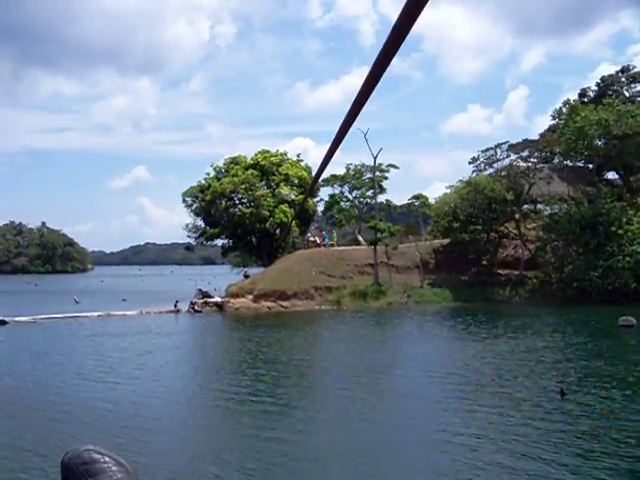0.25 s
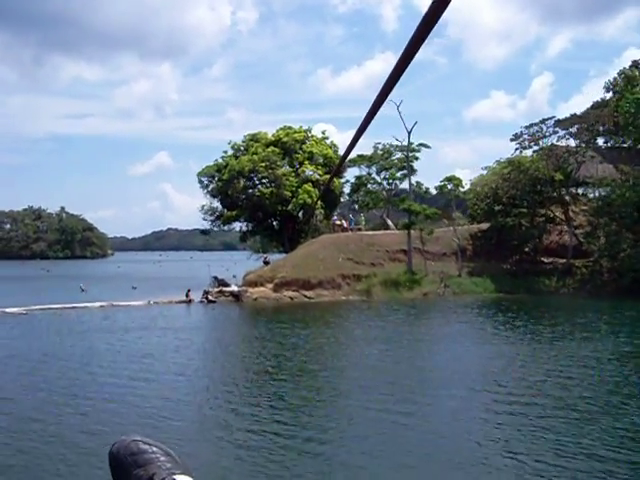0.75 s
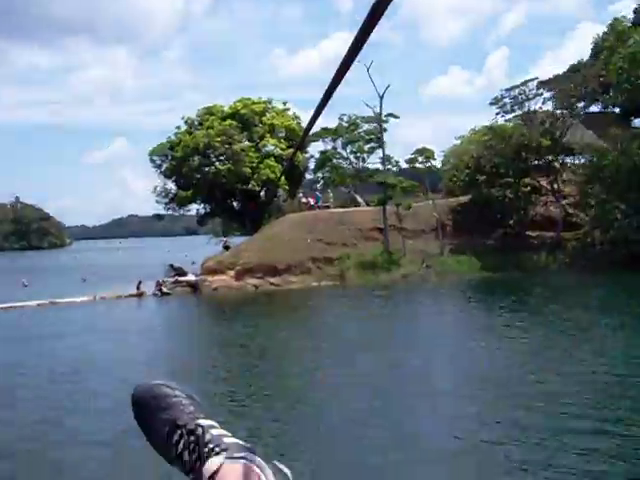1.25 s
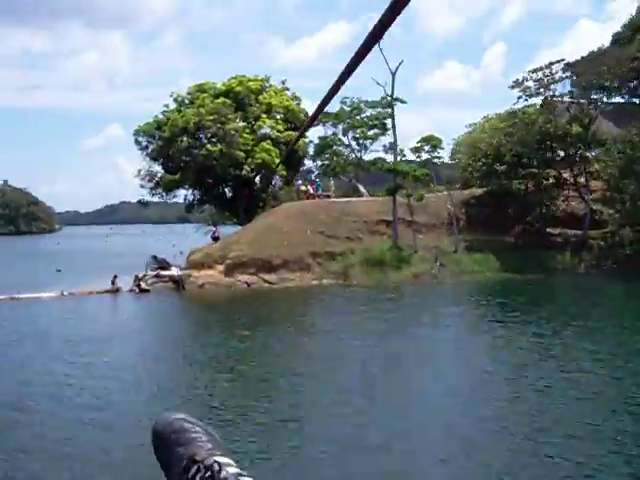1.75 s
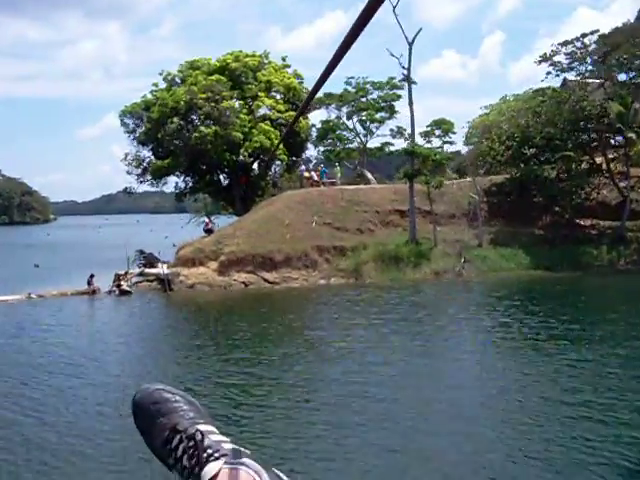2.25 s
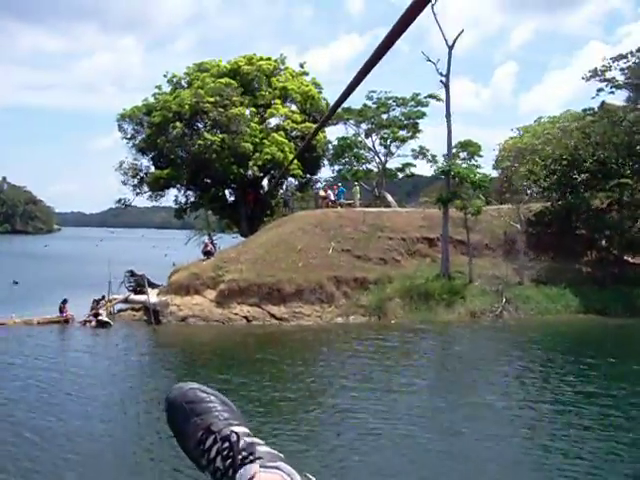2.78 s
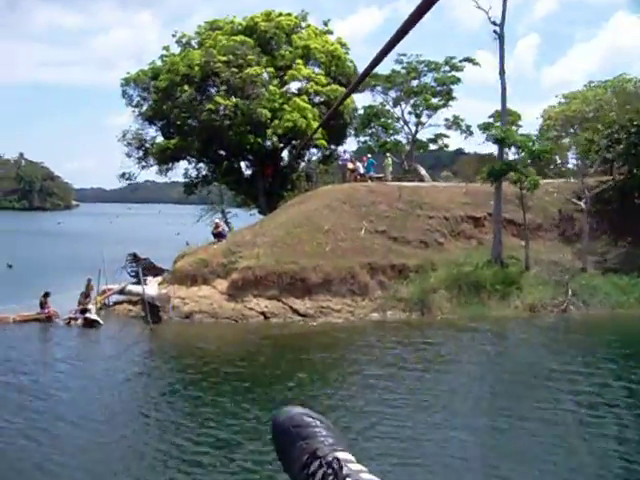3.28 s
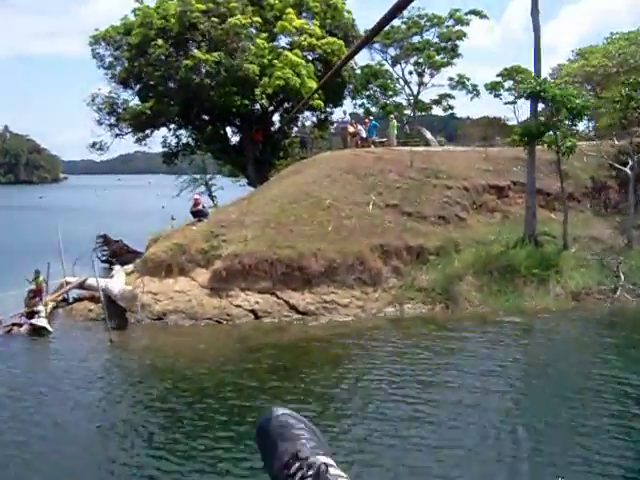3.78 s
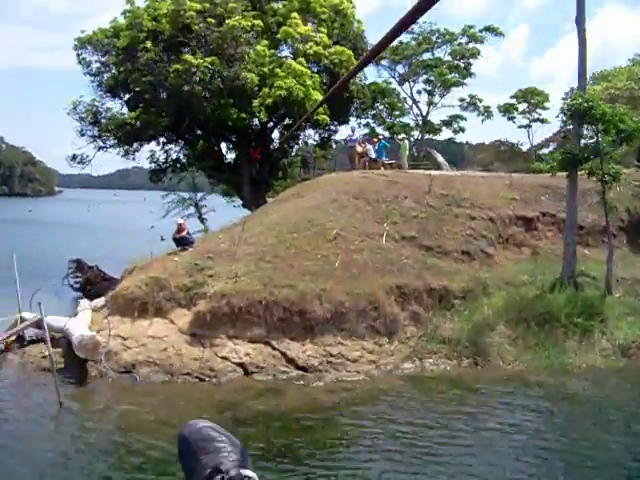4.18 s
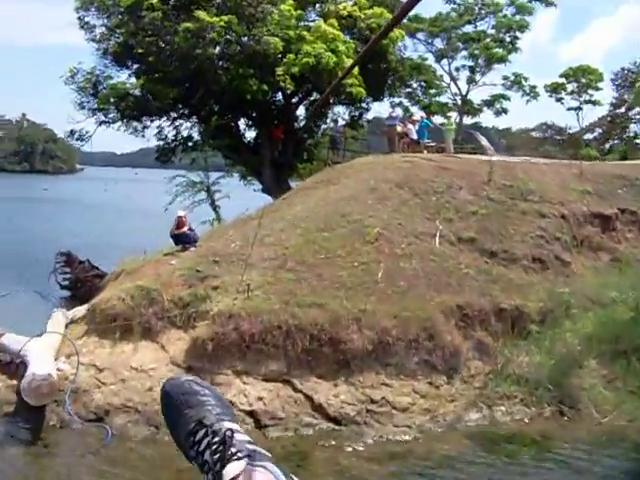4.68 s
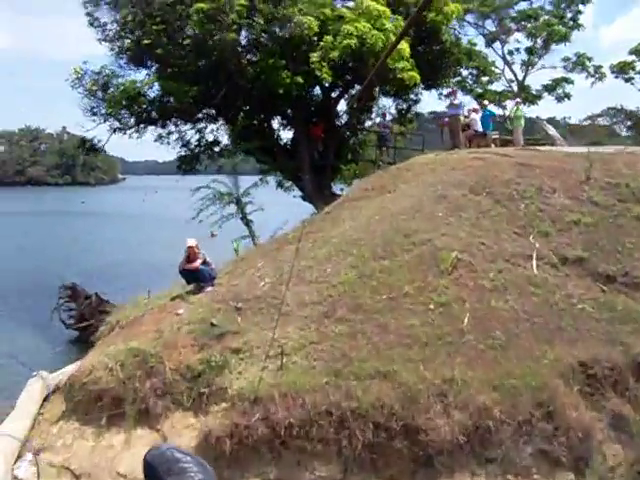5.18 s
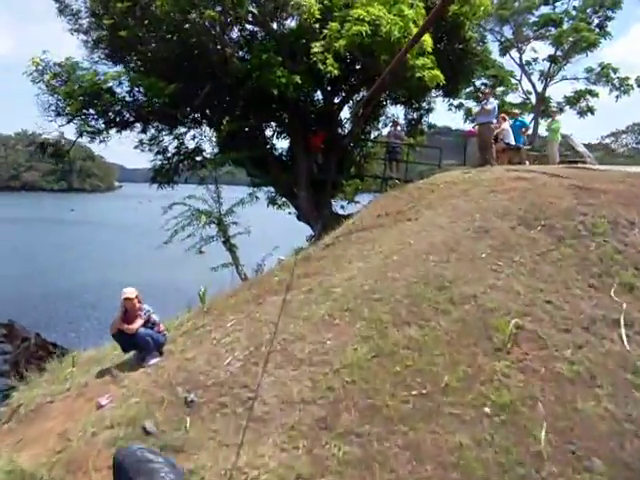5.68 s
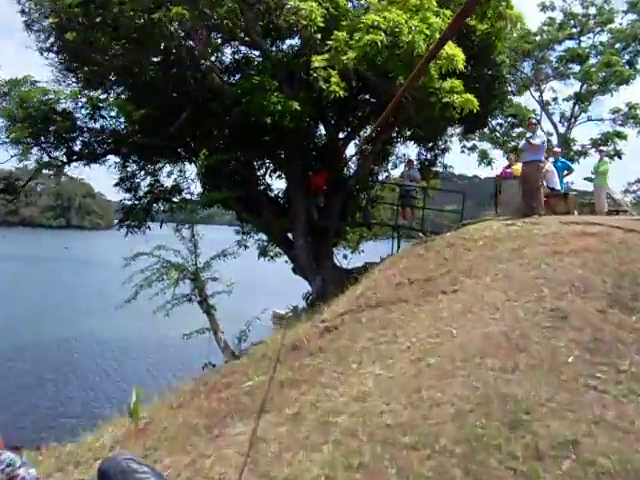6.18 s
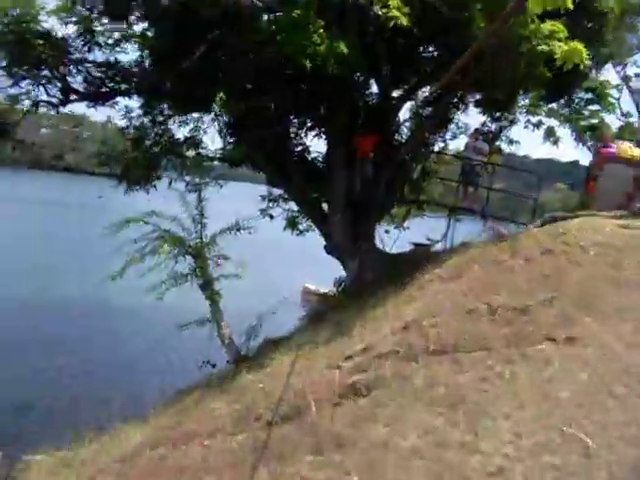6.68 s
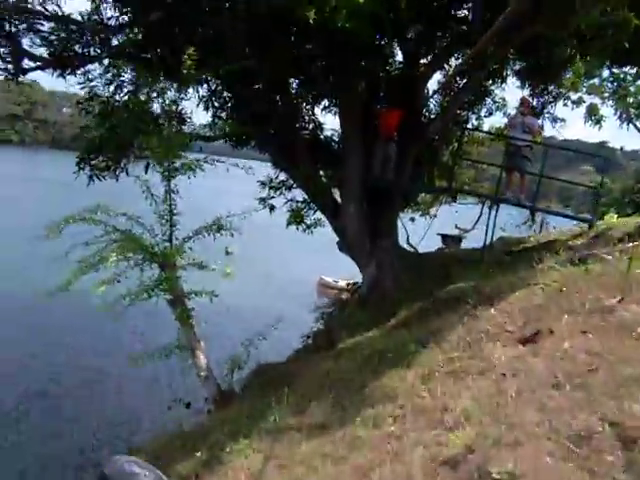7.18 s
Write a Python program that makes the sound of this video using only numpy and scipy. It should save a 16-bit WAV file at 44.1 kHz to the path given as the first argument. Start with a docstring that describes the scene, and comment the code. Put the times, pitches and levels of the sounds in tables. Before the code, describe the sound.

Gusty wind hits the microphone on a zip-line ride across open water, with low, distorted thumps through the first half. Close overhead, the pulley wheels keep up a shrill, fluttering steel whine and hiss, with a faint sinking note behind. As the trolley loses speed the wind dies down, and shortly before the landing the wheels bite into the cable with a rougher, louder buzz.

```python
"""A zip-line trolley runs down a steel cable over a lake, slowly losing speed; the microphone rides just
under it. The sheaves grind over the twisted strands and ring the trolley's steel, throbbing once a turn,
and bite hard near the landing. Behind the whine the strands hum a faint falling note.
Wind buffets the microphone, and whine and wind together overload its input."""
import sys
import numpy as np
from scipy.fft import rfft, irfft
from scipy.io import wavfile

SR = 44100
rng = np.random.default_rng(int(sys.argv[2]) if len(sys.argv) > 2 else 0)


def inscribe(sig):
    """Save sig as 16-bit PCM at rate SR to the path in sys.argv[1].

    A 1-D sig is mono; a 2-D sig holds one channel per row.
    Samples are clipped to [-1, 1] before scaling.
    """
    pcm = np.round(np.clip(np.atleast_2d(sig).T, -1, 1) * 32767)
    wavfile.write(sys.argv[1], SR, pcm.astype(np.int16))


N = 328545
TIME = np.arange(N) / SR
FREQS = np.fft.rfftfreq(N, 1 / SR)
CRUISE_HZ = 60  # sheave turns per second
BITE_S, BITE_ATTACK_S = 6.62, 0.045  # the hard bite near the landing


# speed of the ride over the lake: (time [s], sheave turn rate [Hz])
TURN_RATE = [(0, 71.7), (4.4, 51.9), (6.55, 40.3), (7, 36), (7.45, 32.3)]
# rolling contact, close overhead: (time [s], relative level [dB], high ring [dB], low ring [dB])
CONTACT = [(0, -19.5, 1, -5), (.5, -20.5, 3, -1.5), (1.2, -20.5, 0, -.5), (2.1, -19, -2.5, -2),
           (2.6, -20, -1, -2), (3.25, -23, -4, 1), (4.2, -23, -2, 1.5), (4.85, -23, -3.5, -0.5),
           (5.2, -20.5, -3, -2), (6.35, -20, -1.5, -3.5), (6.75, -19.5, -2.5, -2.5),
           (7.45, -19.5, -6, -3.5)]
# the sheave rides light for an instant: (time [s], length [s], dip [dB])
CONTACT_DIPS = [(3.72, 0.013, -12), (4.519, 0.01, -12), (6.578, .008, -2), (6.6, 0.15, -3.5),
                (6.833, 0.008, -7), (6.868, 0.011, -10)]

def trolley():
    """Just above the microphone, rough rolling contact sets steel and cable sounding."""
    turn_hz, = curves(TURN_RATE)
    contact_db, high_db, low_db = curves(CONTACT)
    hard_bite = np.clip((TIME - BITE_S) / BITE_ATTACK_S, 0, 1)
    bite = hard_bite + (1 - hard_bite) * (0.22 + 0.041 * TIME)  # creeps up, then jumps to 1
    roll_db = contact_db + 3 * hard_bite + 0.5 * waver(6.3) + swells(CONTACT_DIPS)
    turn_phase = 2 * np.pi * np.cumsum(turn_hz) / SR
    strand_phase = 8.04 * turn_phase  # strands passed per turn
    # the load on the contact wavers, and rises a little once a turn
    load_db = 1.2 * np.cos(turn_phase) + 0.69 * waver(42) + 2.2 * waver(260)
    load = unit(undb(load_db) * rng.choice([-1, 1], N))
    # where the cable sits in the groove shifts the weight between low and high modes
    low = undb(low_db + 2 * hard_bite + 0.53 * waver(9))
    high = undb(high_db + 0.24 * waver(7.9))
    whine = (1 - 0.34 * bite) * steel_whine(load, turn_phase, hard_bite, low, high, high_db)
    buzz = undb(-5.5) * bite * strand_buzz(load, strand_phase)
    hiss = undb(-1) * (1 - 0.5 * bite) * np.sqrt(low * high) * grind(load)
    rolling = undb(roll_db) * (undb(23.5) * (whine + buzz) + hiss)
    return rolling + cable_hum(strand_phase, turn_hz, hard_bite)


# sheaves and side plates: (frequency [Hz], width [Hz], relative level [dB], throb per turn [0-1])
STEEL_MODES = [(1662, 13, -17.5, 0.4), (2176, 46.4, -9, .15), (3410, 92, -6.5, 0.34),
               (4257.5, 83.4, 0, 0.55), (4627, 52, -14.5, 0.6), (5385, 133, -7.5, 0.17),
               (5704, 160, -15, 0), (6058, 77, -4, 0.53), (6690, 9.8, -17.5, 0), (6770, 45, -14.5, 0.2),
               (7490, 150, -21, 0.4), (8730, 520, -23, 0)]

def steel_whine(load, turn_phase, hard_bite, low, high, high_db):
    """The contact rings the steel; the ringing sheave turns, so its whine throbs at the microphone."""
    whine = 0
    for hz, width_hz, db, throb in STEEL_MODES:
        weight = low if hz < 3800 else high if hz > 5000 else 1
        depth = throb * (1 - 0.4 * hard_bite)  # the hard bite steadies the throb
        facing = (1 + depth * np.cos(turn_phase)) / np.sqrt(1 + depth ** 2 / 2)
        flare_db = 0.86 * high_db * np.exp(-((hz - 6100) / 220) ** 2)  # near 6100 Hz it flares most
        gain = undb(db + flare_db + 0.78 * waver(17)) * weight * facing
        whine += gain * ring(load * noise(), hz, width_hz)
    return whine


# modes that the bite wakes: (frequency [Hz], width [Hz], relative level [dB])
BUZZ_MODES = [(1660, 25, -14), (2180, 42, -3), (2480, 120, -21), (3370, 170, -11), (4185, 80, 2.5),
              (4440, 120, -10), (5230, 180, -17), (5745, 80, -13), (6035, 60, -10)]

def strand_buzz(load, strand_phase):
    """As the sheave bites, every strand strikes it: a buzz."""
    strikes = unit(undb(11 * np.cos(strand_phase)) * load * noise())
    return sum(undb(db) * ring(strikes, hz, width_hz) for hz, width_hz, db in BUZZ_MODES)


# hiss at the groove, heard close: (frequency [Hz], relative level [dB])
GRIND_SPECTRUM = [(200, -16), (600, -6), (1200, -4), (1950, -3.5), (2400, 0.5), (3000, -1), (4900, -5.5),
                  (6300, -1), (7400, -4.5), (7900, -8.5), (9000, -24.5)]

def grind(load):
    """Steel on steel gives a broad hiss that follows the load."""
    return unit(shape(load * noise(), colour(GRIND_SPECTRUM)))


# the cable overhead under the hard bite: (multiple of the strand rate [-], relative level [dB])
HUM_PARTIALS = [(2, -44), (4, -54)]

def cable_hum(strand_phase, turn_hz, hard_bite):
    """Passing strands give a faint note that sinks with the speed; the hard bite wakes its overtones."""
    fundamental_db = -50.5 + 0.4 * (CRUISE_HZ - turn_hz) - 11.5 * hard_bite
    phase = strand_phase + 0.2 * waver(12)
    overtones = sum(undb(db) * np.sin(round(multiple) * phase) for multiple, db in HUM_PARTIALS)
    fade = undb(-6 * np.maximum(TIME - BITE_S, 0))  # overtones die away as the trolley brakes
    tone = undb(fundamental_db) * np.sin(phase) + hard_bite * overtones * fade
    return tone * undb(4.5 + 0.83 * waver(5.2))


# steady air right on the microphone: (time [s], rumble level [dB], relative flutter level [dB])
AIRFLOW = [(0, -25.5, -31.5), (.62, -29.5, -30.5), (.8, -22, -30), (1.8, -22, -31), (2.15, -25, -37.5),
           (3.15, -24, -35.5), (3.24, -24.5, -26.5), (4.15, -24.5, -28.5), (4.6, -28.5, -32),
           (5.9, -28.5, -37), (6.55, -33, -40.5), (6.8, -36, -39), (7.45, -37, -39)]
# buffets on top of it: (time [s], length [s], rumble change [dB], flutter change [dB])
AIR_BUFFETS = [(1.15, .14, 3.5, 5), (1.39, 0.15, 6.5, 0), (1.52, .09, 6, -1), (1.66, 0.11, 9, -1),
               (1.79, 0.1, 2, 4.5), (1.92, 0.17, 2.5, 1.5), (2.47, 0.052, 10.5, 9.5), (2.72, .18, 6, 4),
               (2.97, 0.079, 9.5, 5), (3.27, 0.065, 5, 2.5), (3.39, .06, -1.5, 3.5), (3.55, 0.067, 8, 4.5),
               (3.87, 0.081, 5.5, 1), (4.02, .08, 3, 4.5), (4.15, .06, 2, 5.5), (4.3, .14, 3, 3),
               (5.52, .12, 2.5, 7), (7.4, 0.21, 6.5, 1)]
# lulls in it: (time [s], length [s], rumble change [dB], flutter change [dB])
AIR_LULLS = [(1.271, 0.1, -6, -7), (2.561, .07, -2.5, -4), (2.87, 0.058, -4.5, 1), (3.734, 0.14, -4.5, -1),
             (5.69, 0.061, -3, -1)]
# fine turbulence at the microphone: (frequency [Hz], relative level [dB])
FLUTTER_SPECTRUM = [(100, -9.5), (200, 3), (330, 1), (480, -1), (800, -4.5), (1400, -11.5), (3000, -21),
                    (9000, -43)]

def wind():
    """Big eddies thump the microphone; fine turbulence flutters in bursts."""
    rumble_db, flutter_db = curves(AIRFLOW)
    turn_hz, = curves(TURN_RATE)
    events = [*AIR_BUFFETS, *AIR_LULLS]
    thump_db, burst_db = swells(events, column=0), swells(events, column=1)
    # the rumble deepens as the ride slows, and in a buffet, whose eddies are bigger
    corner_hz = 151 * (turn_hz / CRUISE_HZ) ** 1.26 * 2 ** (-0.01 * thump_db)
    gust = waver(25)
    rumble, power = 0, 0
    for hz in 20 * 2 ** (np.arange(10) / 2):  # half-octave bands
        band = unit(shape(noise(), 1 / (1 + ((FREQS - hz) / (hz / 4)) ** 4)))
        gain = (hz / 100) ** 0.42 / np.sqrt(1 + (hz / corner_hz) ** 5.3)
        rumble += gain * band
        power += gain ** 2
    rumble *= undb(rumble_db + thump_db + 1.6 * gust) / np.sqrt(power)
    flutter = unit(shape(noise(), colour(FLUTTER_SPECTRUM)))
    flutter *= undb(flutter_db + burst_db - 2 + 0.73 * gust + 3.06 * waver(56))
    return rumble + flutter


def undb(db):
    """Decibels to gain."""
    return 10 ** (np.asarray(db) / 20)


def curves(table):
    """Each column of a table of timed rows, sample by sample."""
    times, *columns = np.transpose(table)
    return [np.interp(TIME, times, column) for column in columns]


def swells(table, column=0):
    """Bell-shaped level changes from rows of (time [s], length [s], change [dB], ...)."""
    return sum(db[column] * np.exp(-(2 * (TIME - s) / length) ** 2) for s, length, *db in table)


def unit(x):
    """Scale to a spread of 1."""
    return x / np.std(x)


def noise():
    """White noise."""
    return rng.standard_normal(N)


def shape(x, response):
    """Filter by a frequency response."""
    return irfft(rfft(x) * response, N)


def colour(points):
    """Response through points of (frequency [Hz], level [dB])."""
    hz, db = np.transpose(points)
    return undb(np.interp(np.log(FREQS + 1), np.log(hz), db))


def waver(rate_hz):
    """Smooth random motion of spread 1, up to about rate_hz."""
    return unit(shape(noise(), 1 / (1 + (FREQS / rate_hz) ** 4)))


def ring(force, hz, width_hz):
    """One mode of the steel, gain 1 at its centre."""
    damping = 1j * FREQS * width_hz
    return shape(force, damping / (hz ** 2 - FREQS ** 2 + damping))


def scene():
    """Trolley and wind at one microphone, riding just under the sheaves."""
    return (trolley() + wind())[None]


def record(dry):
    """The microphone's input saturates, so wind thumps choke the whine; the top treble is cut off."""
    ceiling, top_hz = 0.205, 8600
    clipped = dry / (1 + (dry / ceiling) ** 16) ** (1 / 16)
    response = colour([(20, -0.5), (1000, -2.5), (4000, -0.22), (7500, -2.5), (7950, -12), (8600, -14.5)])
    coloured = shape(clipped, response)
    return shape(coloured, 1 / np.hypot(1, (FREQS / top_hz) ** 70))


dry = scene()
out = record(dry)
inscribe(out)
```